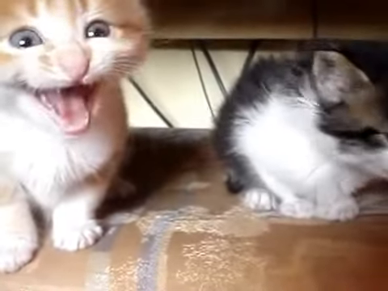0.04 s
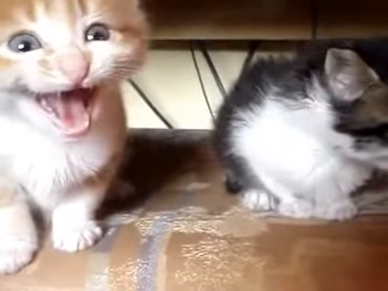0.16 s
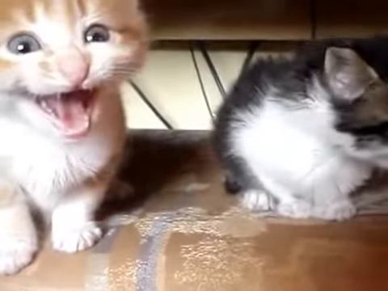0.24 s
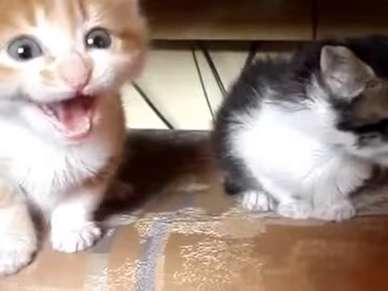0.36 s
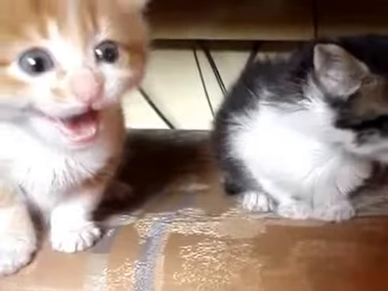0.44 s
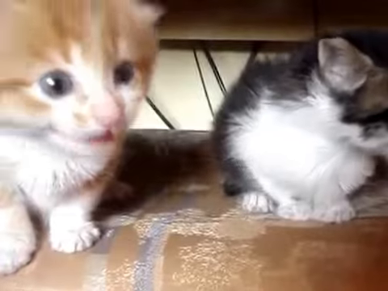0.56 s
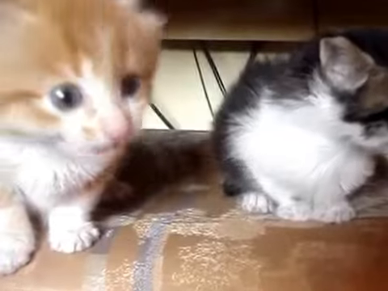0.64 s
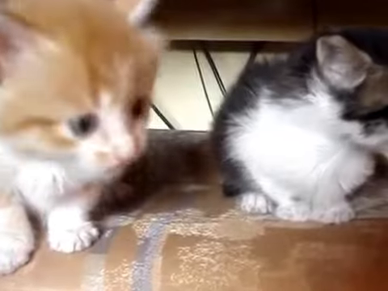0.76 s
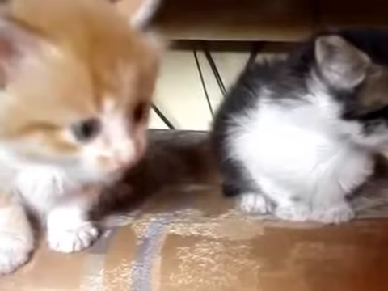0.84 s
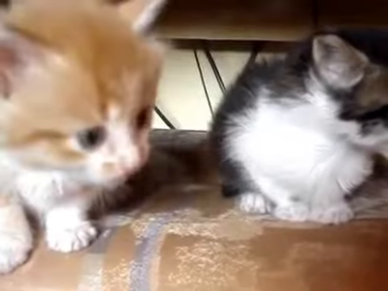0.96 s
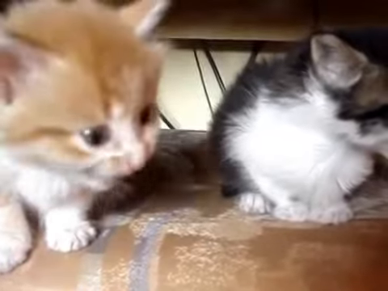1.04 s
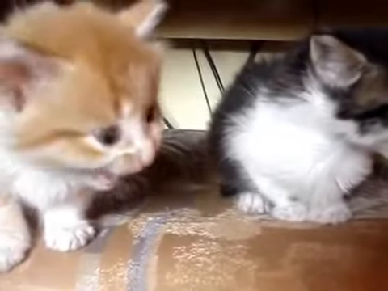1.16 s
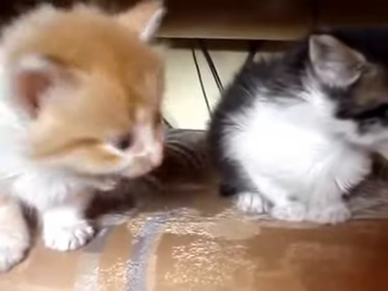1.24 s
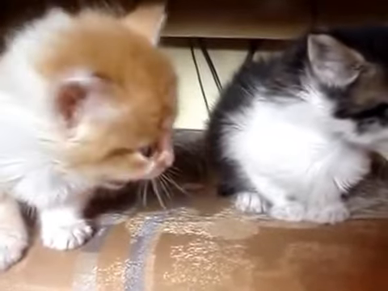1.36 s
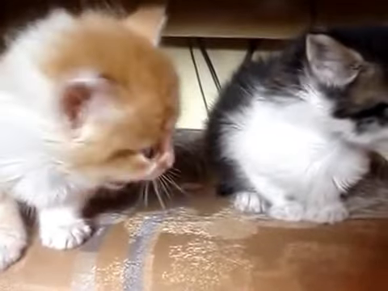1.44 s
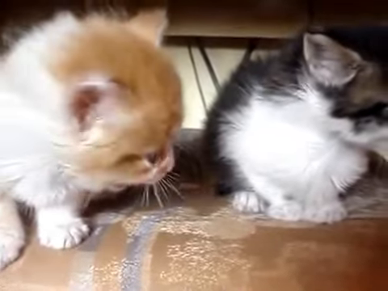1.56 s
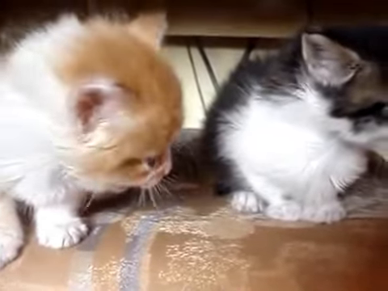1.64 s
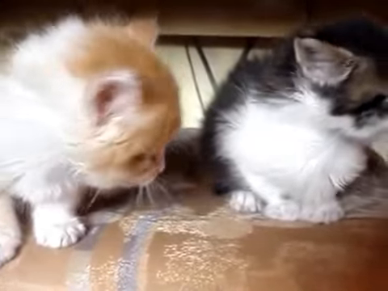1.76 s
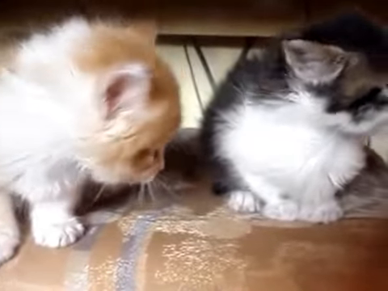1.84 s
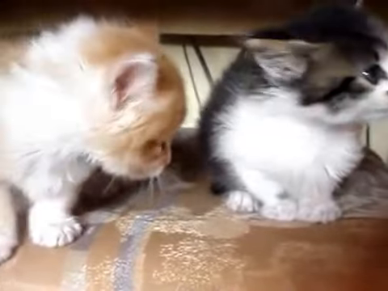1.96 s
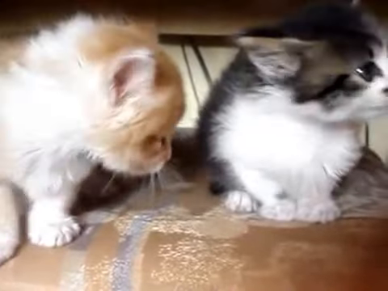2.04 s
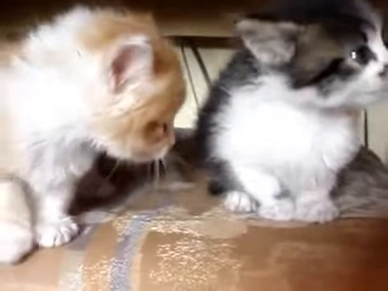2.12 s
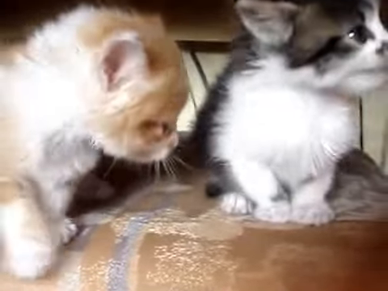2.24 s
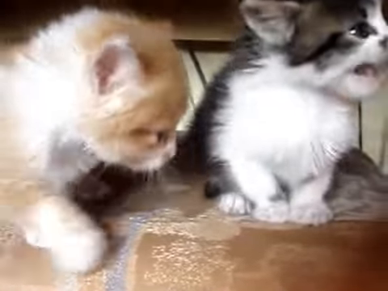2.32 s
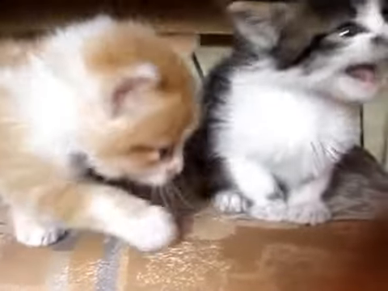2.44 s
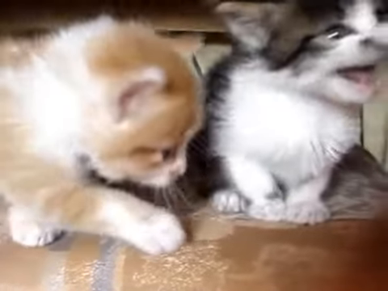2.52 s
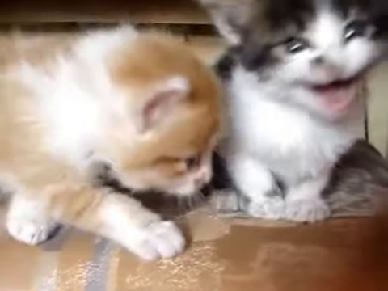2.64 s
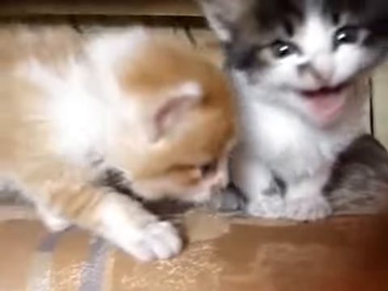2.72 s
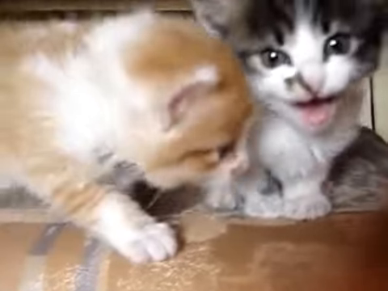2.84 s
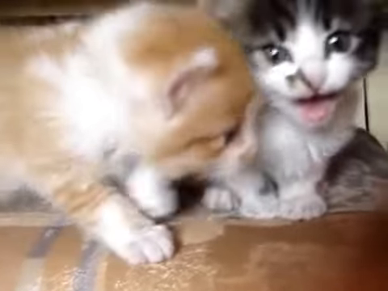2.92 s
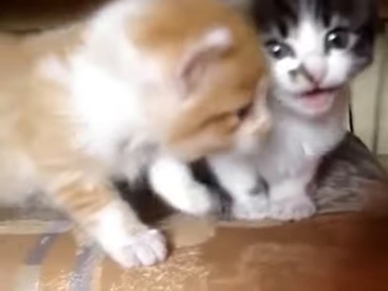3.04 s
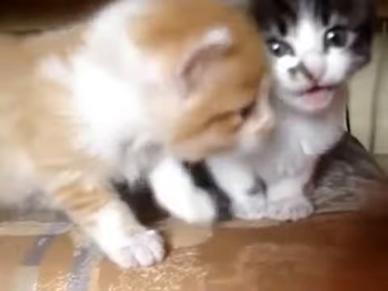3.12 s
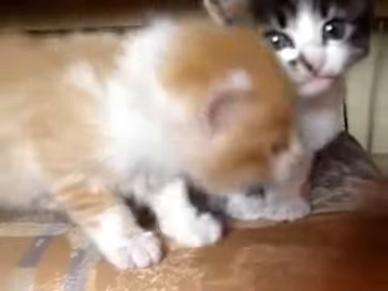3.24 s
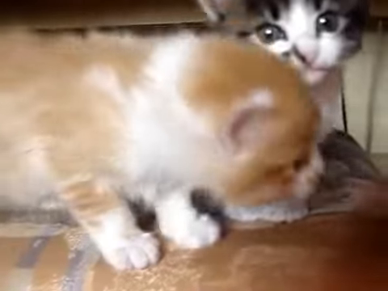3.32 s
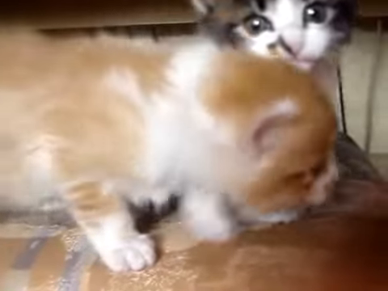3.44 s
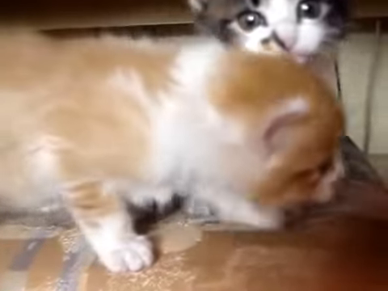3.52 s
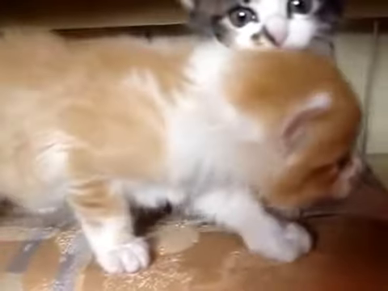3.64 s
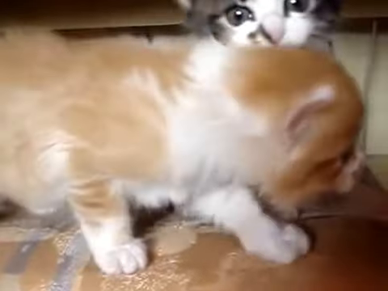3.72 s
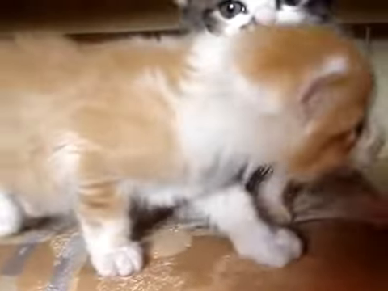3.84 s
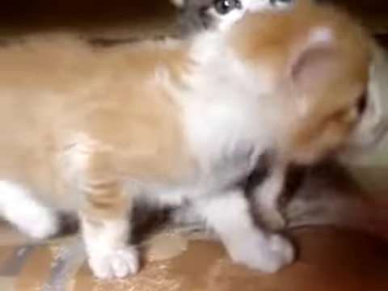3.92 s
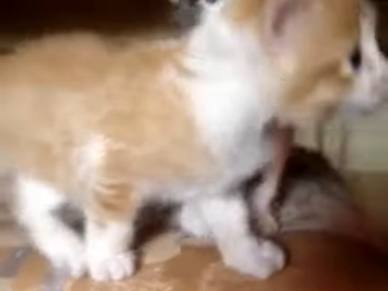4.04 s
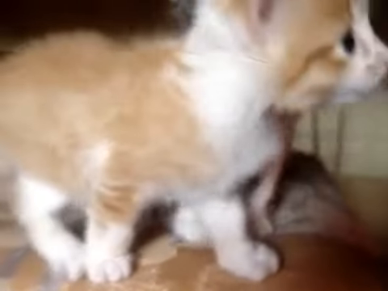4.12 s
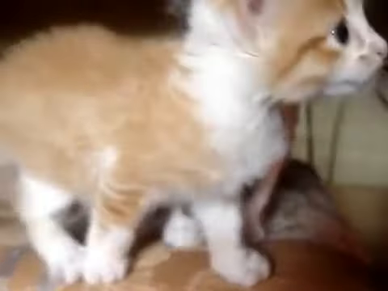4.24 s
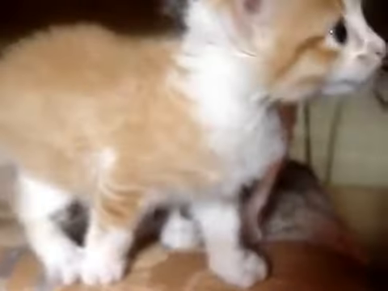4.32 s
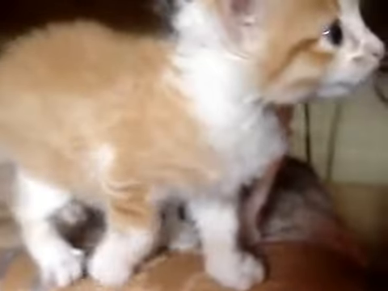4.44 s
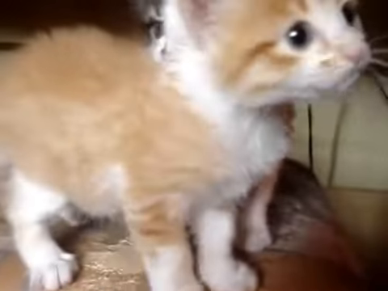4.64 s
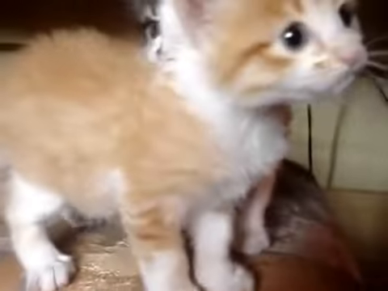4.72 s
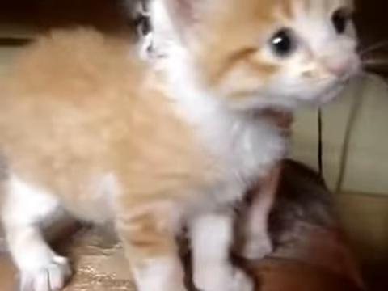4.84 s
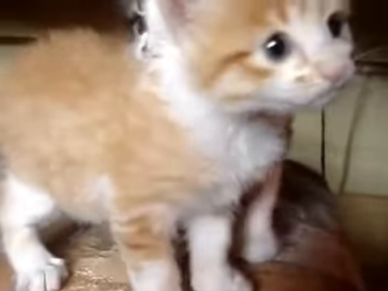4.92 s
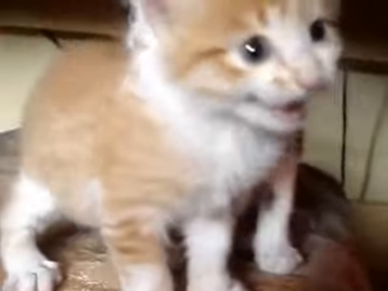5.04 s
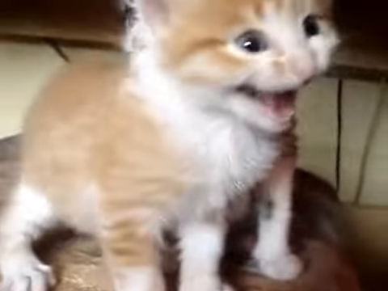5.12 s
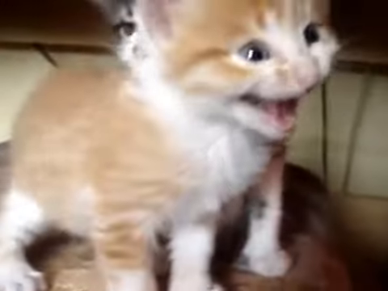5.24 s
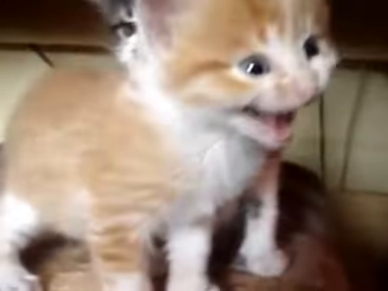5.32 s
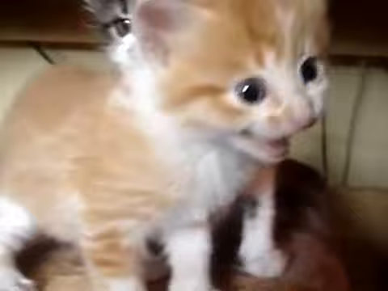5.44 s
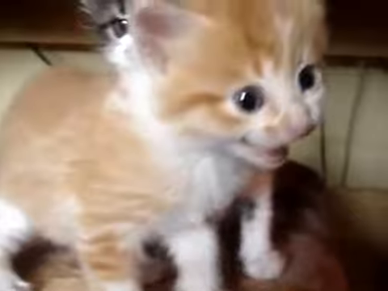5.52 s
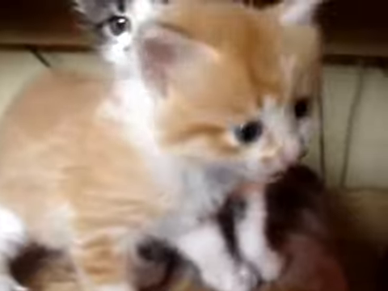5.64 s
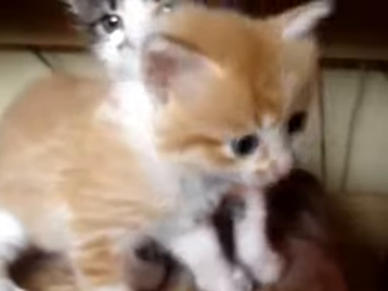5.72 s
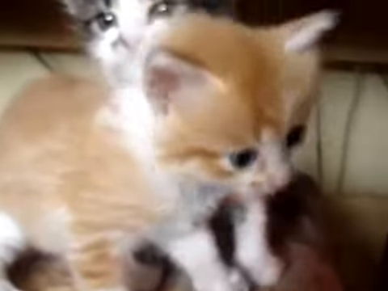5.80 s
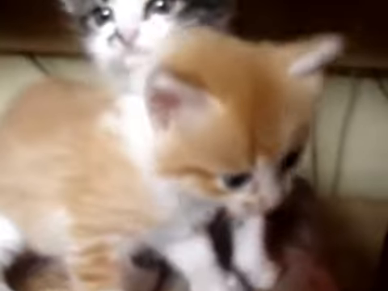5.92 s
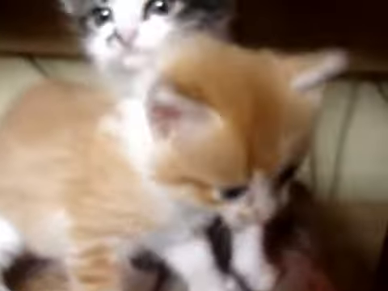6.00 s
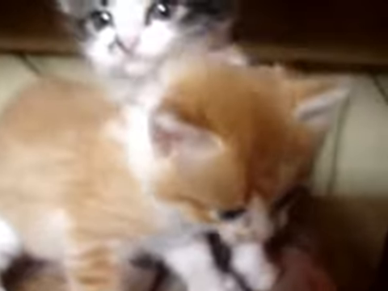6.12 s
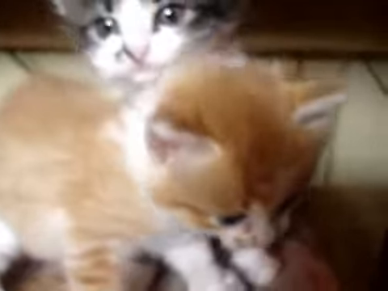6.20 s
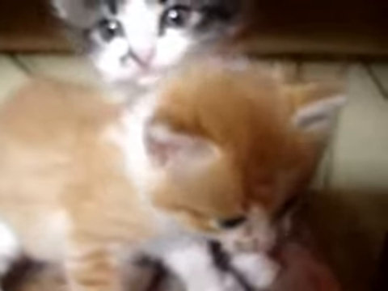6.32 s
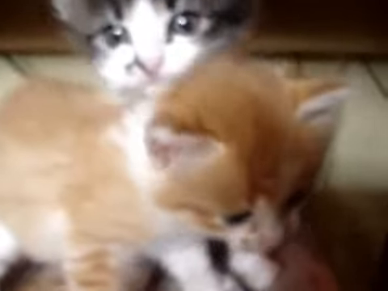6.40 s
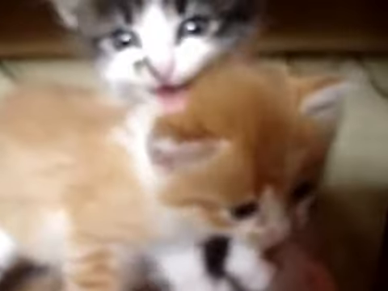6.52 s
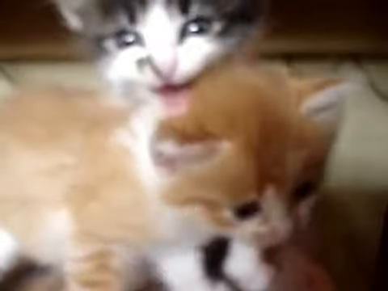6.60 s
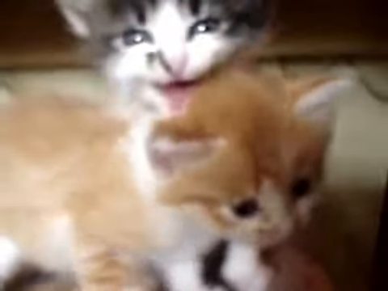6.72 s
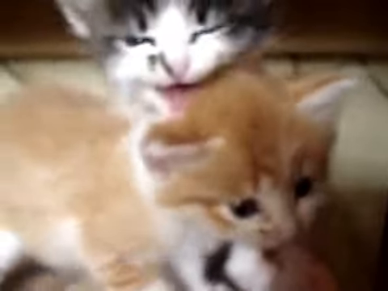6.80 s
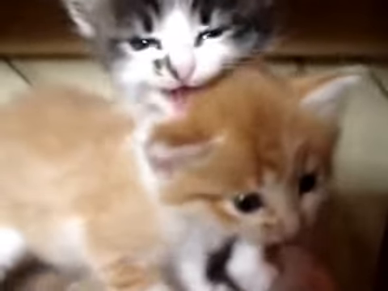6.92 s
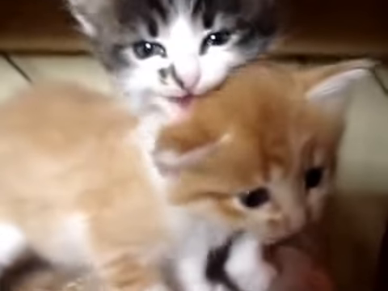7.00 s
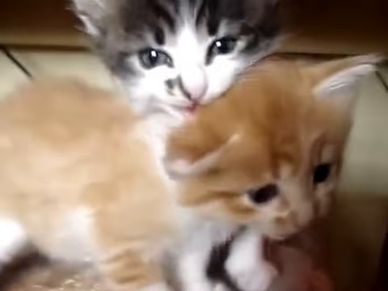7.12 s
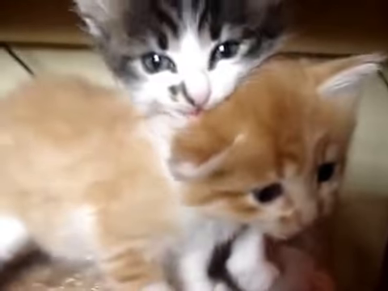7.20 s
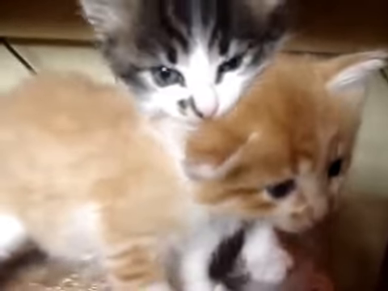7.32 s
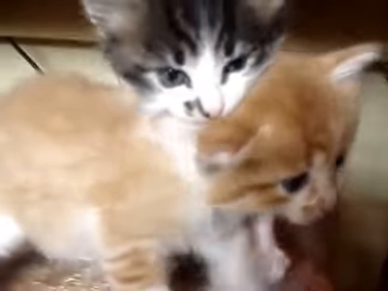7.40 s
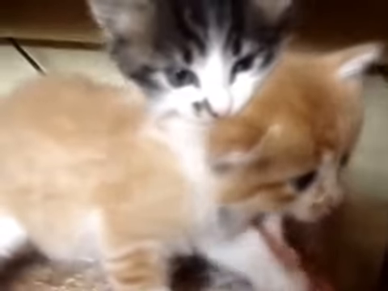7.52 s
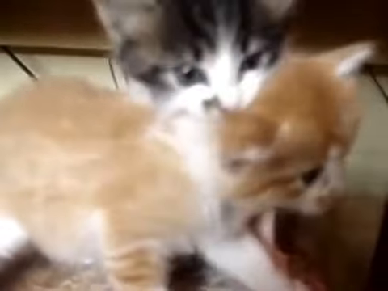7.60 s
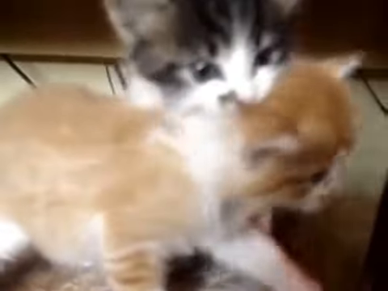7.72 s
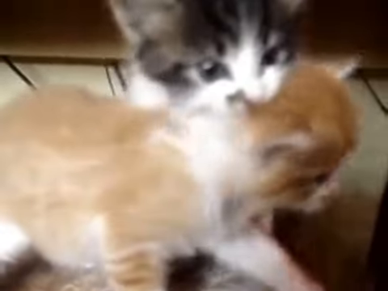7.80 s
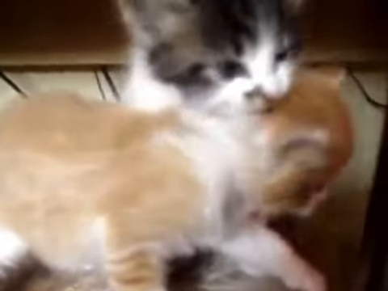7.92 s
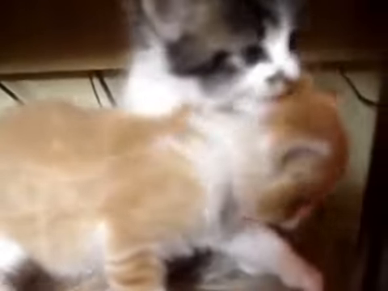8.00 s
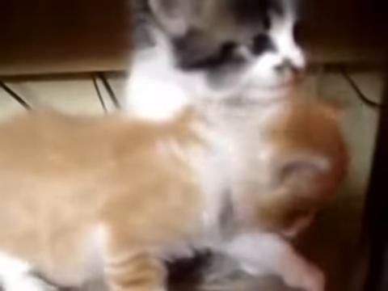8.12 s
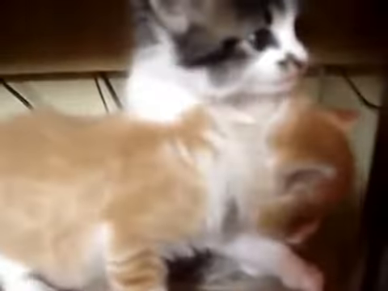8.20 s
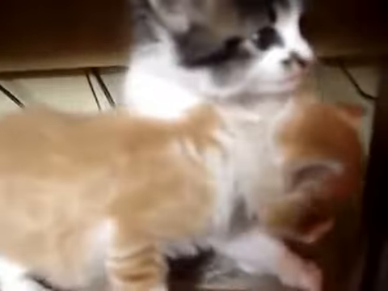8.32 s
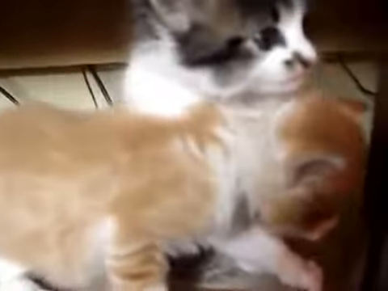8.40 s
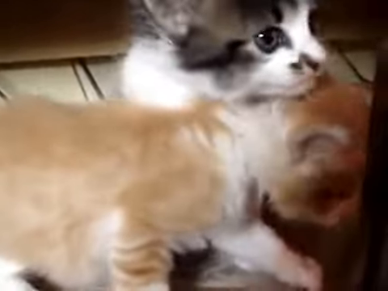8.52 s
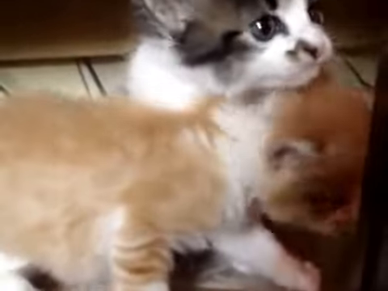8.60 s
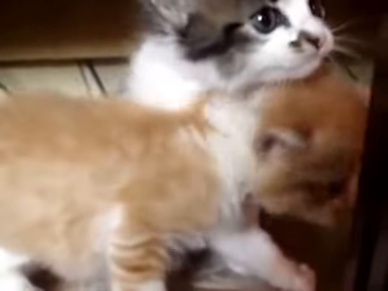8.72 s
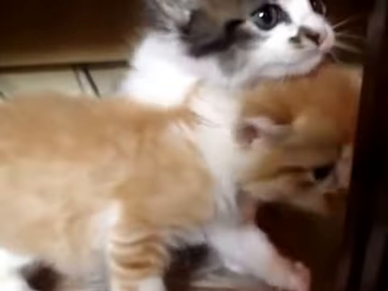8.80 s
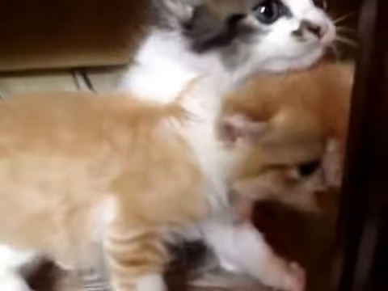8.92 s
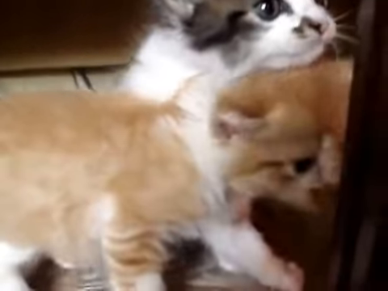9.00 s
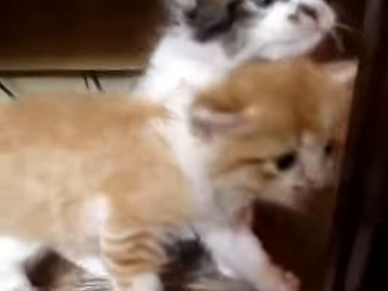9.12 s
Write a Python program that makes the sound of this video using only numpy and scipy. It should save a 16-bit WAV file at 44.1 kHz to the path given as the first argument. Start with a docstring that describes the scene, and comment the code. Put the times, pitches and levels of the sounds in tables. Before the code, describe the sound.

Close, shrill kitten calls in a small indoor space: one strong opening mew, two progressively weaker ones, a stretch of only low fan hum and faint airy hiss, then the most forceful cry, rising fast and dropping. Finally two mews overlap, one strong and lower, one fainter and higher. The fan drones on to the end; the top end is slightly dulled.

```python
"""A kitten is already mewing, close by in a small furnished room, as the sound begins.
Six mews follow one another from two kittens; the last two overlap as a duet.
Each mew is a stack of high harmonics, shaped by a fixed throat and a mouth that opens and closes.
Behind them a fan hums and hisses faintly: beating hums, wavering motor tones and filtered noise."""
import sys
import numpy as np
from scipy import signal
from scipy.fft import rfft, irfft, next_fast_len
from scipy.io import wavfile

SR = 44100
rng = np.random.default_rng(int(sys.argv[2]) if len(sys.argv) > 2 else 0)


def log_audio(samples):
    """Write samples as a 16-bit WAV file to the path given in sys.argv[1]."""
    # one column per channel
    frames = np.atleast_2d(samples).T
    # limit to full scale, then quantise
    limited = np.clip(frames, -1, 1)
    pcm = np.round(limited * 32767).astype(np.int16)
    wavfile.write(sys.argv[1], SR, pcm)


N = 403515   # length in samples, about 9.15 s


def from_db(db):
    """Decibels to gain."""
    return 10 ** (np.asarray(db) / 20)


def rms_one(x):
    """Scale to unit power."""
    return x / np.sqrt(np.mean(x ** 2) + 1e-20)


def at_hz(points, hz):
    """Read a spectrum in dB, with the frequencies spaced by their logarithm as the ear does."""
    points = np.array(points)
    return np.interp(np.log(hz), np.log(points[:, 0]), points[:, 1])


def drift(rate_hz, size):
    """Smooth random wandering of spread 1 that moves about rate_hz times a second."""
    step = 8   # the wandering is made at one point in eight, then joined up
    r = np.exp(-2 * np.pi * rate_hz * step / SR)
    settle = 4000   # let the filter settle before using it
    noise = rng.standard_normal(size // step + settle + 2)
    slow = signal.lfilter([1], [1, -2 * r, r * r], noise)[settle:]
    return np.interp(np.arange(size) / step, np.arange(len(slow)), rms_one(slow))


def phase_of(hz):
    """Running phase of a moving frequency."""
    return 2 * np.pi * np.cumsum(hz) / SR


def gesture(t, start_s, rise_s, hold_s, fall_s):
    """Rises from 0 to 1, holds and falls back."""
    return np.interp(t - start_s, np.cumsum([0, rise_s, hold_s, fall_s]), [0, 1, 1, 0])


JAW_SQUARENESS = 2.65   # above 2 the jaw lingers open and moves quickly
# a last small squeeze comes just before the voice stops: share of a full push, lead and half-length
SQUEEZE_SHARE, SQUEEZE_LEAD_S, SQUEEZE_S = 0.14, 0.062, 0.03
# a kitten that barely pushes whines thinly: brightness per octave, overtones above the mouth resonance
WHINE_BRIGHTNESS_DB, WHINE_TOP_DB = -5.9, 15.2
ONSET_DULL_DB = 13   # per octave: a mew starts with its overtones held back


def controls(t, row):
    """One push sets a mew's loudness and brightness; one arch of the jaw moves its mouth resonance."""
    start_s, swell_s, hold_s, release_s, peak_db, trend_db_per_s, whine_db = row[0]
    widest_s, jaw_s, shut_hz, open_hz = row[1]
    bright_db, top_db, throat_db, high_hz, onset_s = row[2]

    push = gesture(t, start_s, swell_s, hold_s, release_s)
    before_end_s = t[-1] - t
    push = push + SQUEEZE_SHARE * np.exp(-((before_end_s - SQUEEZE_LEAD_S) / SQUEEZE_S) ** 2)
    full_db = peak_db + trend_db_per_s * np.maximum(t - start_s - swell_s, 0)
    level_db = whine_db + push * (full_db - whine_db)

    jaw = np.exp(-np.abs((t - start_s - widest_s) / jaw_s) ** JAW_SQUARENESS)
    mouth_hz = shut_hz + jaw * (open_hz - shut_hz)

    bare = np.clip(1 - (t - t[0]) / onset_s, 0, 1)   # 1 at the very start, then 0
    brightness = WHINE_BRIGHTNESS_DB + push * (bright_db - WHINE_BRIGHTNESS_DB) - ONSET_DULL_DB * bare
    overtone_db = WHINE_TOP_DB + push * (top_db - WHINE_TOP_DB)
    return level_db, mouth_hz, brightness, overtone_db, throat_db, high_hz


def narrow_noise(phase, width_hz):
    """Unit-power noise in a steep-sided band that follows the given phase."""
    lowpass = signal.butter(5, width_hz / 2, fs=SR, output="sos")
    a, b = signal.sosfilt(lowpass, rng.standard_normal((2, len(phase))))
    return rms_one(a * np.cos(phase) + b * np.sin(phase))


HIGH_THROAT_DB, HIGH_THROAT_WIDTH_HZ = 4.5, 450   # a narrow ring high in the throat
# the fixed colour of a kitten's throat, before the moving parts reshape it
# columns: pitch_hz [Hz], level_db [relative dB]
THROAT_COLOUR = [(900, 0), (1400, -9), (2300, -5.5), (3300, -11.7), (4500, -13.3), (5600, -16), (7000, -14),
                 (8500, -17), (10000, -30)]


def mew(pitch_curve, row, rough=0.27, tremor=0.002, jitter=0.0024, shimmer_db=.45, flutter_db=1.9,
        mouth_width_hz=410, rough_width_hz=640, throat_hz=2350, fade_in_s=0.005, fade_out_s=0.016, count=10):
    """Vocal-fold harmonics pass the throat and the moving mouth resonance; pushing harder makes them rasp."""
    curve_s, curve_hz = np.transpose(pitch_curve)
    span = np.arange(max(0, int(curve_s[0] * SR)), int(curve_s[-1] * SR))
    t, size = span / SR, len(span)
    pitch = np.interp(t, curve_s, curve_hz)
    level_db, mouth_hz, brightness, overtone_db, throat_db, high_hz = controls(t, row)
    effort = from_db(0.1 * (level_db - level_db.max()))

    # the folds never hold a pitch exactly: a slow tremor and a fast jitter
    phase = phase_of(pitch * (1 + tremor * drift(25, size) + jitter * drift(300, size)))
    k = np.arange(1, count + 1)[:, None]   # one row a harmonic
    hz = k * pitch

    colour_db = at_hz(THROAT_COLOUR, hz) + brightness * np.log2(k)
    colour_db += overtone_db * np.clip((hz - mouth_hz) / 1500, 0, 1)
    # each cry has its own strength of low throat resonance and its own place for the high one
    colour_db += throat_db * np.exp(-((hz - throat_hz) / 700) ** 2)
    colour_db += HIGH_THROAT_DB * np.exp(-((hz - high_hz) / HIGH_THROAT_WIDTH_HZ) ** 2)
    # the upper harmonics flutter most
    colour_db += flutter_db * hz / hz.mean() * np.array([drift(10.4, size) for _ in k])

    mouth_loss = np.hypot(1, 2 * (hz - mouth_hz) / mouth_width_hz)
    gains = from_db(colour_db) / mouth_loss
    gains /= np.sqrt(np.sum(gains ** 2, axis=0))   # colour alone must not change the loudness

    # uneven cycles put a noisy skirt around the high harmonics; the low ones stay purer
    skirts = np.array([narrow_noise(n * phase, rough_width_hz) for n in k])
    rasp = rough * effort * np.minimum(hz / 5200, 1) ** 4
    voice = np.sum(gains * (np.sin(k * phase) + rasp * skirts), axis=0)

    fade = np.clip(np.minimum((t - t[0]) / fade_in_s, (t[-1] - t) / fade_out_s), 0, 1)
    out = np.zeros(N)
    out[span] = voice * fade * from_db(level_db + shimmer_db * drift(50, size))
    return out


# how the pitch of each mew glides from its first to its last sound
# columns: time_s [s], pitch_hz [Hz]; the first table holds three such curves, one a mew
SOLO_PITCHES = [
    [(0.0, 1229), (0.084, 1247), (0.216, 1197), (0.252, 1171), (0.426, 1119), (0.484, 1144), (0.555, 1142)],
    [(1.13, 1073), (1.156, 1074), (1.224, 1171), (1.282, 1194), (1.322, 1228), (1.386, 1242), (1.754, 1097),
     (1.815, 1102)],
    [(2.365, 975), (2.375, 966), (2.457, 1173), (2.575, 1121), (2.839, 1064), (2.921, 1002), (3.061, 975),
     (3.135, 875)],
]
LOUD_PITCH = [(5.072, 927), (5.154, 1251), (5.2, 1378), (5.245, 1445), (5.28, 1396), (5.49, 1328),
              (5.552, 1257), (5.612, 1123), (5.665, 965)]
DUET_LOW_PITCH = [(6.59, 889), (6.62, 1010), (6.66, 1110), (6.93, 1092), (7.12, 998), (7.2, 976),
                  (7.255, 1016)]
DUET_HIGH_PITCH = [(6.73, 1150), (6.76, 1239), (6.809, 1296), (7.09, 1230), (7.24, 1103), (7.285, 980)]
# how each mew is pushed, mouthed and voiced: one row a mew, the last two together, in three groups
# push: start_s [s], swell_s [s], hold_s [s], release_s [s], peak_db [dB],
#       trend_db_per_s [dB per s, after the swell], whine_db [dB, before and after the push]
# jaw: widest_s [s after the start], jaw_s [s, half-length of the opening], shut_hz [Hz], open_hz [Hz]
# voice: bright_db [dB per octave, full push], top_db [dB, overtones above the mouth resonance, full push],
#        throat_db [dB, low throat resonance], high_hz [Hz, high throat resonance],
#        onset_s [s until the overtones have come in]
MEWS = [((-0.128, 0.095, 0.263, 0.175, -17.4, -14.4, -38.8), (0.178, 0.39, 3080, 4750),
        (4.1, -9.5, 0.5, 6530, 0.005)), ((1.132, 0.134, 0.235, 0.26, -24.2, -31, -46),
        (0.035, 0.32, 3745, 4865), (3, -9.5, 2.2, 8510, 0.005)),
        ((2.398, 0.092, 0.111, 0.3, -28.8, 23, -44.3), (0.182, 0.234, 3100, 4300),
        (2.2, -11.5, -6.3, 6200, 0.067)), ((5.105, 0.123, 0.326, 0.04, -16.2, -34, -41.6),
        (0.278, 0.168, 3350, 5080), (0.9, -6, -5.5, 7080, 0.05)),
        ((6.585, 0.149, 0.165, 0.3, -19.4, -20, -41.5), (0.217, 0.163, 3380, 4680),
        (0.9, -6.6, 2.3, 7930, 0.068)), ((6.729, 0.096, 0.247, 0.064, -29.7, -16, -42),
        (0.129, 0.19, 3290, 4235), (-0.1, -3.1, -7.7, 7330, 0.012))]


def kittens():
    """Each mew joins one glide of pitch to one push of breath and one arch of the jaw."""
    pitches = [*SOLO_PITCHES, LOUD_PITCH, DUET_LOW_PITCH, DUET_HIGH_PITCH]
    return sum(mew(pitch_curve, row) for pitch_curve, row in zip(pitches, MEWS))


ROOM_T60_S, ROOM_DB = 0.4, -14   # time for the tail to fall 60 dB, and the tail's strength


def room(x, echo_share=0.065, count=8):
    """Nearby furniture throws early echoes that make gliding harmonics swell and dip; a short tail follows."""
    t = np.arange(SR // 2) / SR
    tail = rng.standard_normal(len(t)) * from_db(-60 * t / ROOM_T60_S) * (t > .008)
    response = from_db(ROOM_DB) * tail / np.sqrt(np.sum(tail ** 2))
    lags = (rng.uniform(.003, .022, count) * SR).astype(int)
    response[lags] += echo_share * rng.choice([-1, 1], count)
    return x + signal.fftconvolve(x, response)[:N]


HUM_DB, HUM_HZ = -57.6, 219           # the fan's main hum outside its louder spell
HUM_SWELL_DB, HUM_SAG_HZ = 9, 4.3     # how much louder and lower it gets in that spell
# the spell in which the hum grows louder and a little lower
# columns: start_s [s], rise_s [s], hold_s [s], fall_s [s]
HUM_SWELL = (3.68, 0.22, 2.52, 0.15)


def fan_hum(waver=.007, beat_db=-61, beat_hz=216.3):
    """A steady hum beats against a weaker, wavering one close in pitch."""
    swell = gesture(np.arange(N) / SR, *HUM_SWELL)
    main = from_db(HUM_DB + HUM_SWELL_DB * swell) * np.sin(phase_of(HUM_HZ - HUM_SAG_HZ * swell))
    weaker = from_db(beat_db) * np.sin(phase_of(beat_hz * (1 + waver * drift(2.49, N))))
    return np.sqrt(2) * (main + weaker)   # root 2 turns a sine's RMS level into its peak


# the fan's fainter motor tones, which waver around these values
# columns: pitch_hz [Hz], level_db [dB, before a lift shared by all]
FAN_TONES = [(425.3, -64), (495.3, -64.5), (726.7, -64), (850.6, -73.5), (936.7, -68), (1147, -74.5),
             (1281, -73.5), (1459, -73), (1707, -73.5), (1873, -74), (3408, -82), (4081, -79.5)]


def fan_tones(lift_db=1.5, waver=.009, throb_db=3.0):
    """Each faint motor tone wanders a little in pitch and throbs in level."""
    tones = np.zeros(N)
    for tone_hz, tone_db in FAN_TONES:
        phase = phase_of(tone_hz * (1 + waver * drift(8.98, N)))
        tones += from_db(lift_db + tone_db + throb_db * drift(7.2, N)) * np.sin(phase)
    return np.sqrt(2) * tones


AIR_DB = -53   # overall level of the rush of air
# the colour of the fan's rush of air
# columns: pitch_hz [Hz], level_db [relative dB per Hz]
AIR_COLOUR = [(25, -19), (60, -14), (150, -7), (300, -6.5), (600, -7), (1000, -10), (1600, -14.5),
              (3000, -16.5), (5300, -20.5), (7000, -24.5), (9000, -27), (10000, -30.5)]


def fan_air():
    """Moving air is random noise, coloured smoothly by frequency."""
    size = next_fast_len(N)
    bins_hz = np.maximum(np.arange(size // 2 + 1) * SR / size, 1)
    spectrum = rfft(rng.standard_normal(size)) * from_db(at_hz(AIR_COLOUR, bins_hz))
    return from_db(AIR_DB) * rms_one(irfft(spectrum, size)[:N])


def scene():
    """Six mews in the room, over the fan."""
    fan = fan_hum() + fan_tones() + fan_air()
    return (room(kittens()) + fan)[None]


CUTOFF_HZ = 10050


def record(dry):
    """The recorder cuts the top steeply."""
    return signal.sosfiltfilt(signal.ellip(10, .05, 60, CUTOFF_HZ, fs=SR, output="sos"), dry)


dry = scene()
out = record(dry)
log_audio(out)
```